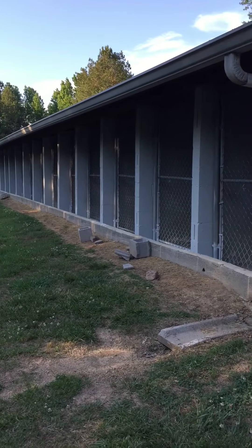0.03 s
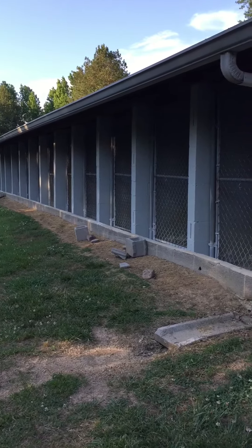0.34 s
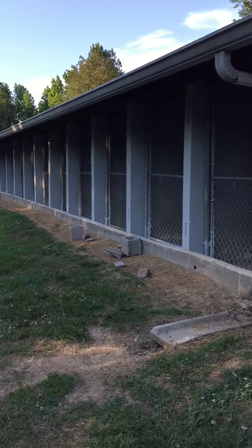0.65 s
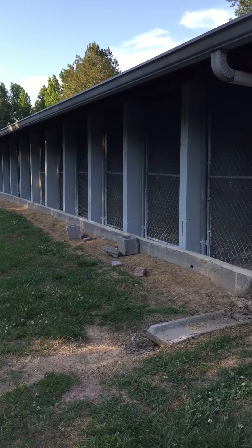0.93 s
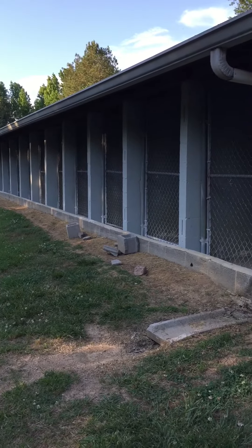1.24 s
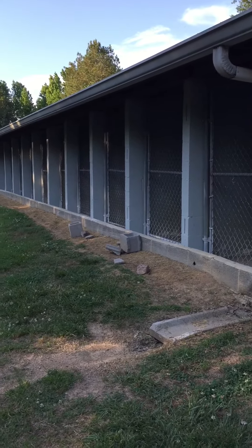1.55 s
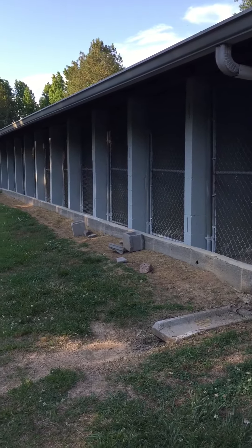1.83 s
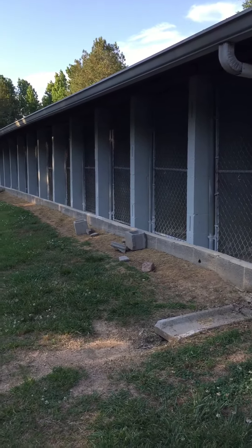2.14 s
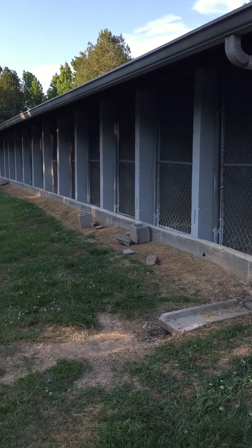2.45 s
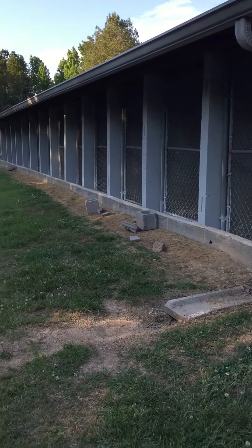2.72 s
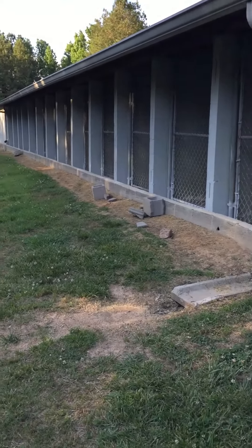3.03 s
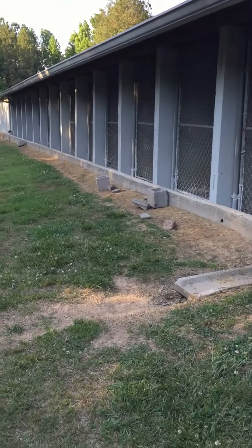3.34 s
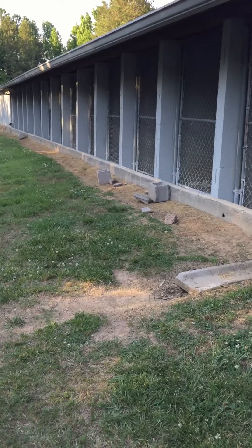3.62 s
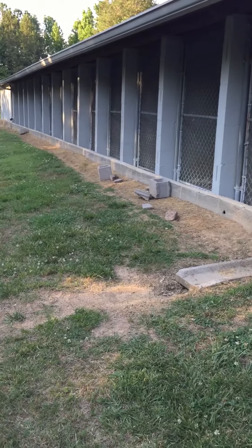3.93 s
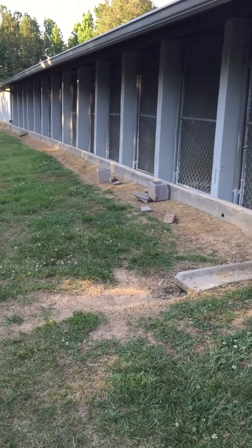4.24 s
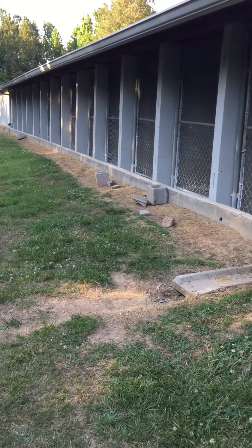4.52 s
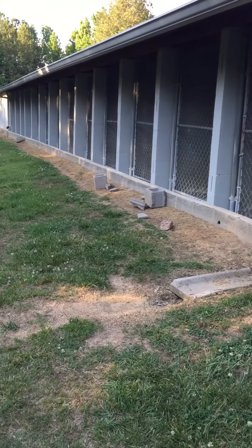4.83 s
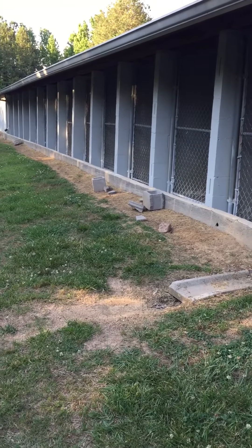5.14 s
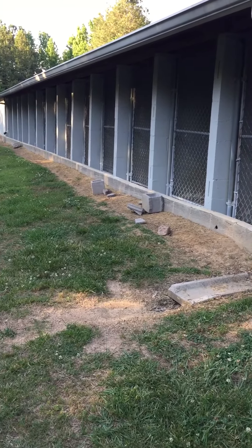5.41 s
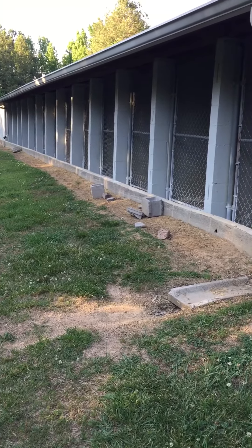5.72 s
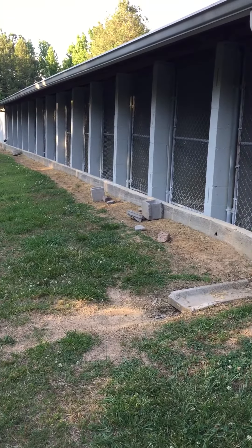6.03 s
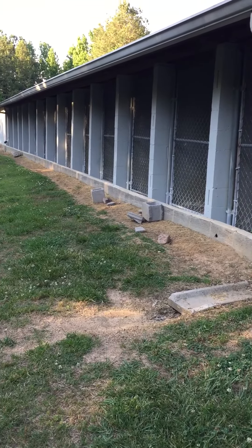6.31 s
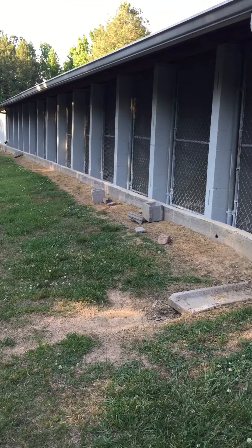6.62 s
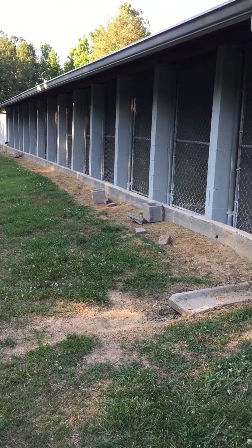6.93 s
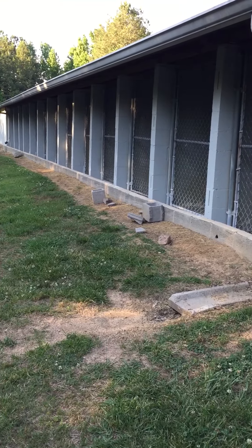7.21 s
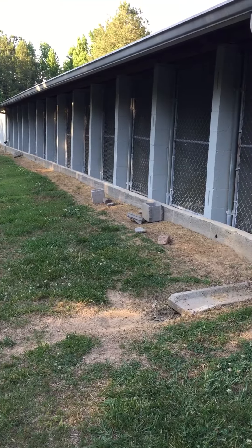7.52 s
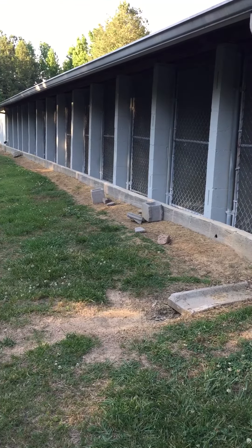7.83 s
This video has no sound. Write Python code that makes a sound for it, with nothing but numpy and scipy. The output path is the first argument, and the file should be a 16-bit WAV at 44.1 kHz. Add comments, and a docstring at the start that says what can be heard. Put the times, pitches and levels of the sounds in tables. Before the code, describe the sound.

Several dogs yelp, whine and howl over one another in an echoing kennel, heard from outside with light wind.

```python
"""Dogs yelp and howl in a long concrete kennel block, heard from the grass outside.
Their vocal folds make high, hoarse yelps and cleaner howls that slide from one note to another.
Thin whines and far woofs join in, and a big dog moans at the end.
The hard walls smear every glide into an echo, and light wind bumps the microphone over a soft hush."""
import sys
import numpy as np
from scipy import signal
from scipy.fft import rfft, irfft, next_fast_len
from scipy.io import wavfile

SR = 44100
rng = np.random.default_rng(int(sys.argv[2]) if len(sys.argv) > 2 else 0)


def wav_out(sig):
    """Save sig, one row per channel (or a flat mono array), as 16-bit PCM at SR to the path in sys.argv[1]."""
    wavfile.write(sys.argv[1], SR, np.round(np.clip(np.atleast_2d(sig).T, -1, 1) * 32767).astype(np.int16))


N = 347067
TIME = np.arange(N) / SR
CUTOFF_HZ = 15700


# How a wide-open mouth boosts or weakens overtones: frequency_hz, gain_db
YELP_MOUTH = [(1050, -13.5), (1450, 3), (1750, 1.5), (2200, -2.5), (2450, -4), (2700, -27), (3000, -20),
              (3320, -5), (3750, -16.5), (4350, -11), (4800, -18.5), (6500, -18.5), (9000, -33.5)]
# One yelp a row: start_s, length_s, pitch_hz, crack_octaves, fall_octaves, level_db,
# roughness (0 to 1), octave_db, overtones_db, rasp_db
YELPS = [ (2.008, 0.16, 1120, .17, 0.67, -34.5, 0.79, -2.5, -33.5, 0),
         (2.435, .15, 1076, 0.14, 0.18, -35, 0.56, -5.5, -32.5, -8.5),
         (2.796, .15, 1462, 0.019, 0.044, -31.5, 0.54, -8, -27, -6),
         (3.4, 0.2, 1146, 0.29, 0.28, -33, 0.8, -2, -31, 4),
         (4.459, .13, 701.5, 0.27, .35, -32, 0.8, -11.5, -32.5, -16),
         (5.114, .18, 958, 0.063, 0.61, -37, 0.75, -9, -32, -7.5),
         (6.117, 0.14, 1051, .06, 0.01, -35, 0.59, -5.5, -27.5, -17.5)]

def yelp(start_s, length_s, pitch_hz, crack_octaves, fall_octaves, level_db,
         roughness, octave_db, overtones_db, rasp_db):
    """The voice scoops up, turns hoarse, cracks upward, then drops as the breath runs out."""
    t = clock(length_s)
    hoarseness = roughness * (1 + np.tanh((t - .042) / .026)) / 2
    scoop = .22 * np.exp(-t / .029)
    crack = crack_octaves * np.exp(-((t - .07) / .012) ** 2)
    fall = fall_octaves * np.exp(-(np.maximum(length_s - t, 0) / .04) ** 2)
    pitch = pitch_hz * 2 ** (crack - scoop - fall)
    level_db += envelope_db(t, length_s, attack_s=.029, release_s=.069, edge_db=-20.5)
    voice = vocal_folds(pitch, level_db, hoarseness, octave_db, overtones_db, YELP_MOUTH, harmonics=6,
                        waver=.019, jitter=.045, smear_hz=113.5, rasp_db=rasp_db,
                        growl_db=-23.5, strain_db=15)
    return place(start_s, voice)


# How a howling mouth shapes overtones: frequency_hz, gain_db
HOWL_MOUTH = [(700, 3), (1050, 1), (1450, -8), (1750, -5), (2050, 2), (2400, -2.5), (2750, -28),
              (3400, -23.5), (3750, -20), (4300, -21), (4900, -25), (6000, -15), (7600, -22.5),
              (8500, -31.5)]
# One howl a row (slide_at_s and peak_at_s count from its start): start_s, length_s, first_hz, second_hz,
# slide_at_s, slide_s, level_db, peak_at_s, fade_db_per_s, roughness (0 to 1), octave_db, overtones_db
HOWLS = [ (2.471, .14, 587, 560, .08, .02, -48, 0.036, 40, 0.04, -20, -35.5),
         (2.55, .13, 844.3, 681, 0.09, 0.011, -28, 0.028, 176.5, 0.2, -15.5, -41.5),
         (3.655, 0.18, 906.4, 633.5, 0.098, .024, -34.5, 0.044, 16.5, 0.22, -13, -38.5),
         (3.846, 0.22, 640, 597, 0.086, 0.037, -37, .05, 12.5, .08, -22.5, -41),
         (4.017, 0.41, 780.1, 671.3, .118, .013, -25, 0.049, 28, 0.12, -4.5, -38),
         (4.242, 0.3, 682.3, 649.3, 0.093, 0.023, -26.5, 0.013, 36, 0.11, -4.5, -37.5),
         (4.621, 0.79, 697, 640, .52, 0.032, -25, 0.1, 53.5, 0.04, -14.5, -38.5),
         (4.648, 0.57, 749.6, 682.7, 0.24, 0.02, -38, 0.081, 9.5, .1, -16, -22.5),
         (5.287, 0.38, 768, 637, .235, 0.019, -33.5, 0.21, 22, .09, -11.5, -32),
         (5.729, 0.71, 645, 654.8, 0.16, 0.02, -27.5, 0.053, 143.5, 0.07, -39.5, -33),
         (6.228, 0.68, 830.3, 531.2, 0.21, 0.027, -34, 0.059, 46.5, 0, -7.5, -33)]

def howl(start_s, length_s, first_hz, second_hz, slide_at_s, slide_s, level_db, peak_at_s,
         fade_db_per_s, roughness, octave_db, overtones_db, mouth=HOWL_MOUTH, harmonics=12):
    """A held note slides to a second one, swelling and fading with the breath."""
    t = clock(length_s)
    progress = (1 + np.tanh((t - slide_at_s) / slide_s / 2)) / 2
    sag_octaves = .03174 * t
    pitch = (first_hz + (second_hz - first_hz) * progress) * 2 ** -sag_octaves
    # During the slide the voice frays and its octave gets louder.
    sliding = 2 * np.sqrt(progress * (1 - progress))
    roughness += 1.7 * np.log2(first_hz / second_hz) ** 2 * sliding
    octave_db += 5.5 * sliding
    # The highest overtones ring out in mid-howl, more so in a loud one.
    near_ends = np.cos(np.pi * np.minimum(t / length_s, 1)) ** 2
    ring_db = 10.5 + 4.6 * (level_db + 25.5) - 15 * near_ends
    level_db -= fade_db_per_s * np.abs(t - peak_at_s)
    level_db += envelope_db(t, length_s, attack_s=.014, release_s=.036, edge_db=-17)
    voice = vocal_folds(pitch, level_db, roughness, octave_db, overtones_db, mouth, harmonics,
                        waver=.005, jitter=.065, smear_hz=83, rasp_db=-24.5,
                        growl_db=-28.5, strain_db=23, ring_db=ring_db)
    return place(start_s, voice)


# The tone of the rasp in a hoarse cry: frequency_hz, level_db
RASP_COLOUR = [(480, -40.5), (700, -2.5), (1050, -8.5), (1470, 32), (1650, -17), (1900, -23.5), (2250, 2.5),
               (2700, -33.5), (3300, -18.5), (3800, -29), (4300, -20.5), (5000, -36), (7000, -23.5),
               (12000, -46)]

def vocal_folds(pitch_hz, level_db, roughness, octave_db, overtones_db, mouth, harmonics,
                waver, jitter, smear_hz, rasp_db, growl_db, strain_db, ring_db=0):
    """Vibrating folds make a note, its octave, and higher overtones that grow with strain."""
    size = len(pitch_hz)
    roughness = np.clip(roughness, 0, 1)
    pitch_hz = pitch_hz * (1 + waver * drift(28.8, size) + jitter * roughness * drift(110, size))
    phase = 2 * np.pi * np.cumsum(pitch_hz) / SR
    tones = [(1, 1), (2, from_db(octave_db + at_hz(mouth, 2 * pitch_hz)))]   # multiple of pitch, gain
    for k in range(3, harmonics + 1):
        # Each overtone swells and fades on its own as the head moves.
        swell_db = 3 * drift(6, size) + ring_db * (k * pitch_hz > 4500)
        tone_db = overtones_db + swell_db + strain_db * roughness * 3 / k
        tones.append((k, from_db(tone_db + at_hz(mouth, k * pitch_hz))))
    # In a half-rough voice, strong and weak vibrations take turns and add in-between tones.
    growl = from_db(growl_db) * np.exp(-((roughness - .45) / .1) ** 2)
    tones += [(1 / 2, growl), (3 / 2, growl)]
    voice = np.zeros(size)
    for k, gain in tones:
        # Irregular vibration blurs each tone toward noise.
        unsteady = np.sqrt(1 - roughness ** 2) + roughness * flutter(smear_hz, size)
        voice += gain * (k * pitch_hz < CUTOFF_HZ) * np.real(unsteady * np.exp(1j * k * phase))
    rasp = from_db(rasp_db) * roughness ** 2 * noise(RASP_COLOUR, size)
    return from_db(level_db) * (np.sqrt(2) * voice + rasp)


# How the mouth shapes a deep voice's overtones: frequency_hz, gain_db
DEEP_MOUTH = [(750, 1.5), (920, -20), (1050, -1.5), (1280, -10), (1450, -36.5), (2200, -24)]
# One moan a row, with the same columns as HOWLS
MOANS = [ (7.19, .13, 480, 404.8, 0.0352, 0.015, -40.5, 0.019, 62, 0.51, -10, -16),
         (7.27, 0.349, 406.6, 416.3, .09, 0.027, -39, 0.3, 32, 0.031, -21, -36),
         (7.584, .38, 503, 533.8, 0.12, 0.063, -51.5, 0.3, 31, 0.025, 3, -43),
         (7.68, .26, 419, 410.6, 0.072, .03, -53, 0.13, 4, 0.014, -20, -34)]

def moan(*row):
    """A big dog's moan is a low howl with few overtones."""
    return howl(*row, mouth=DEEP_MOUTH, harmonics=4)


# Big dogs' woofs and, at 4.54 s and 5.25 s, the low undertones of hoarse yelps:
# peak_s, pitch_hz, level_db
GRUFF_NOTES = [(1.429, 530, -63.5), (2.607, 412, -55.5), (3.112, 392.3, -49.5), (3.13, 591, -54.5),
               (3.201, 445, -60.5), (3.741, 367.3, -52.5), (3.819, 426, -53.5), (4.281, 513, -51.5),
               (4.54, 589, -42.5), (4.928, 496, -57), (5.25, 562, -42.5), (5.859, 431, -49.5),
               (7.22, 432.7, -44)]

def gruff_note(peak_s, pitch_hz, level_db, attack_s=.027, release_s=.09, edge_db=-18):
    """A short woof or a yelp's undertone; its pitch rises and falls with its loudness."""
    length_s = attack_s + release_s
    shape_db = envelope_db(clock(length_s), length_s, attack_s, release_s, edge_db)
    pitch = pitch_hz * (1 - .1 * shape_db / edge_db)
    voice = vocal_folds(pitch, level_db + shape_db, roughness=.72, octave_db=-16.5, overtones_db=-17.5,
                        mouth=DEEP_MOUTH, harmonics=3, waver=.056, jitter=.056, smear_hz=70.6,
                        rasp_db=-26, growl_db=-23.5, strain_db=7)
    return place(peak_s - attack_s, voice)


# Whines through the nose and, at 4.66 s, a high overtone ringing out of the long howl:
# start_s, length_s, pitch_hz, bend (1 is the usual glide), level_db, overtones_db
THIN_TONES = [ (1.09, 0.25, 3548, 1.8, -68, -9.5), (1.628, 0.18, 3340, .8, -68.5, -17),
              (2.029, 0.29, 3310, 1.4, -64.5, -19), (2.429, 0.17, 3180, 0.76, -59.5, -36),
              (2.799, 0.3, 3160, 1.28, -62, -2), (3.368, 0.32, 3096, 0.9, -57.5, -4.5),
              (4.108, 0.15, 3075, 0.69, -66, -27.5), (4.66, 0.18, 3507, .5, -69.5, -23.5),
              (5.124, 0.56, 2990, 1, -69, -1), (5.822, 0.31, 2990, 0.15, -78.5, 3),
              (6.355, .54, 3132, 0.94, -59, -8.5), (6.976, 0.31, 8200, 0.12, -71, -36.5)]

def thin_tone(start_s, length_s, pitch_hz, bend, level_db, overtones_db):
    """A high, trembling tone: a whistled whine or a howl's ringing overtone."""
    pitch, shape_db = rise_and_sink(length_s, pitch_hz, bend)
    wavering = pitch * (1 + .0065 * drift(45, len(pitch)))
    phase = 2 * np.pi * np.cumsum(wavering) / SR
    tone = np.sin(phase)
    for k, drop_db in [(2, 0), (3, 24), (4, 24)]:
        tone += from_db(overtones_db - drop_db) * (k * pitch < CUTOFF_HZ) * np.sin(k * phase)
    tremble_db = 2.5 * drift(22, len(pitch))
    return place(start_s, np.sqrt(2) * from_db(level_db + shape_db + tremble_db) * tone)


def rise_and_sink(length_s, pitch_hz, bend):
    """A pitch and a level that both rise quickly, then sink."""
    t = clock(length_s)
    glide = -.017 * np.exp(-t / .044) - .17 * t
    shape_db = envelope_db(t, length_s, attack_s=.033, release_s=.093, edge_db=-19.5) - 17.5 * t
    return pitch_hz * 2 ** (bend * glide), shape_db


# One faint whimper: start_s, length_s, pitch_hz, level_db, octave_db
WHIMPERS = [(1.085, .17, 460, -82, 14)]

def whimper(start_s, length_s, pitch_hz, level_db, octave_db):
    """A thin whine made with the voice, nearly all overtones."""
    pitch, shape_db = rise_and_sink(length_s, pitch_hz, bend=.96)
    voice = vocal_folds(pitch, level_db + shape_db, roughness=.22, octave_db=octave_db,
                        overtones_db=10.5, mouth=HOWL_MOUTH, harmonics=6, waver=.012, jitter=.037,
                        smear_hz=39.7, rasp_db=-6, growl_db=-20, strain_db=10)
    return place(start_s, voice)


# The tone of air in a nose: frequency_hz, level_db
NOSE_COLOUR = [(1200, -7.5), (1900, -6.5), (2700, 0.5), (3400, 1), (4000, -27), (7000, -30), (10000, -43)]
# One puff a row: middle_s, half_length_s, level_db
NOSE_PUFFS = [(.58, 0.12, -79.5), (1.195, 0.067, -71), (1.716, .09, -73)]

def nose_puffs():
    """Air hisses softly through a dog's nose before and during the first whines."""
    swells = sum(from_db(level_db) * bell_curve(TIME - middle_s, half_length_s)
                 for middle_s, half_length_s, level_db in NOSE_PUFFS)
    return swells * noise(NOSE_COLOUR, N)


# How long the echo takes to fade by 60 dB: frequency_hz, fade_s
ECHO_TIMES = [(350, 0.53), (1000, 1.1), (2500, 0.89), (6000, 0.84), (12000, 0.1)]

def kennel(sound, direct_db, echo_db, build_s):
    """The direct sound plus a dense echo off concrete walls and roof; the treble dies first."""
    t = TIME[:SR * 3 // 2]
    edges_hz = np.geomspace(150, 16000, 9)
    build_up = 1 - np.exp(-(t / build_s) ** 2)
    tail = np.zeros(len(t))
    for low, high in zip(edges_hz, edges_hz[1:]):
        band = filtered(rng.standard_normal(len(t)), 2, [low, high], "band")
        decay = from_db(-60 * t / at_hz(ECHO_TIMES, np.sqrt(low * high))) * build_up
        tail += band * decay / np.sqrt(np.sum(decay ** 2))
    return from_db(direct_db) * sound + from_db(echo_db) * signal.fftconvolve(sound, tail)[:N]


# One bump of wind a row: middle_s, level_db, half_length_s, top_hz
WIND_BUMPS = [(0.744, -43, 0.011, 65.5), (1.027, -53.5, 0.048, 76), (1.341, -39, 0.017, 139),
              (1.514, -48.5, 0.014, 87), (1.789, -36.5, 0.0056, 87), (1.956, -53, 0.08, 87),
              (3.138, -48, 0.048, 99.2), (3.21, -37, 0.028, 87.4), (3.39, -51, 0.073, 75.6),
              (5.998, -52, 0.026, 85), (6.295, -57, 0.076, 80), (6.843, -57, 0.063, 68.4),
              (7.567, -52.5, 0.074, 82.4)]

def wind_bumps(low_hz=38):
    """Each swirl of air shakes the microphone with a brief, low rumble."""
    t = np.arange(-SR // 2, SR // 2) / SR
    out = np.zeros(N)
    for middle_s, level_db, half_length_s, top_hz in WIND_BUMPS:
        swell = bell_curve(t, half_length_s)
        bump = filtered(rng.standard_normal(len(t)), 3, [low_hz, top_hz], "band") * swell
        bump *= np.sqrt(np.sum(swell ** 2) / np.sum(bump ** 2))
        out += from_db(level_db) * np.interp(TIME - middle_s, t, bump, left=0, right=0)
    return out


# The tone of the breeze: frequency_hz, level_db
BREEZE_COLOUR = [(20, -26), (45, 2.5), (75, 0.5), (150, -18.5), (400, -41.5)]

def breeze(level_db=-73, swing_db=4):
    """Small swirls of air make a faint, lumpy rumble."""
    return from_db(level_db - swing_db * drift(20, N)) * noise(BREEZE_COLOUR, N)


# The tone of the background: frequency_hz, level_db
HUSH_COLOUR = [(20, -18), (35, -3), (55, -0.5), (110, -6.5), (220, -11.5), (500, -20.5), (1200, -22),
               (2500, -23), (5000, -29), (9300, -32), (10400, -36.5), (11500, -34), (15500, -37)]

def hush(level_db=-66.5):
    """Steady outdoor hush and microphone hiss."""
    return from_db(level_db) * noise(HUSH_COLOUR, N)


def clock(length_s):
    """Seconds since a call began, running on to the next quarter second."""
    return TIME[:int(np.ceil(length_s * 4)) * SR // 4]


def envelope_db(t, length_s, attack_s, release_s, edge_db):
    """Rise from `edge_db`, hold at 0 dB, then fall away."""
    return edge_db * (np.maximum(1 - t / attack_s, 0) + np.maximum(1 - (length_s - t) / release_s, 0))


def bell_curve(t, half_length_s):
    """A smooth hump that peaks at t = 0."""
    return np.exp(-.5 * (t / half_length_s) ** 2)


def place(start_s, call):
    """Set a call into the scene with click-free ends."""
    fades = signal.windows.tukey(len(call), SR / 100 / len(call))
    return np.concatenate([np.zeros(int(start_s * SR)), fades * call, np.zeros(N)])[:N]


def noise(colour, size):
    """Noise of strength 1, with its lows and highs shaped by a table."""
    padded = next_fast_len(size)
    spectrum = rfft(rng.standard_normal(padded))
    gains = from_db(at_hz(colour, np.arange(len(spectrum)) * SR / padded))
    return rms_one(irfft(spectrum * gains, padded)[:size])


def drift(rate_hz, size):
    """A random wander of strength 1, up to about `rate_hz` fast."""
    return rms_one(filtered(rng.standard_normal(size + SR // 2), 2, rate_hz))[-size:]


def flutter(rate_hz, size):
    """Random swings of strength and phase that spread a tone by `rate_hz` each way."""
    white = rng.standard_normal((2, size + SR // 4))
    real, imag = filtered(white, 6, rate_hz)[:, -size:]
    return (rms_one(real) + 1j * rms_one(imag)) / np.sqrt(2)


def filtered(sound, order, hz, keep="low"):
    """Keep the lows, the highs or a band; a higher order cuts more steeply."""
    return signal.sosfilt(signal.butter(order, hz, keep, fs=SR, output="sos"), sound)


def at_hz(points, hz):
    """Read between a table's rows on a log-frequency axis."""
    table = np.array(points)
    return np.interp(np.log(np.maximum(hz, 1)), np.log(table[:, 0]), table[:, 1])


def from_db(db):
    """Decibels to gain."""
    return 10 ** (np.asarray(db) / 20)


def rms_one(x):
    """Scale to an average strength (rms) of 1."""
    return x / np.sqrt(np.mean(x ** 2) + 1e-20)


def scene():
    """All the dogs in the echoing kennel, with wind and hush outside."""
    yelps = sum(yelp(*row) for row in YELPS)
    whimpers = sum(whimper(*row) for row in WHIMPERS)
    howls = sum(howl(*row) for row in HOWLS)
    moans = sum(moan(*row) for row in MOANS)
    thin_sounds = sum(thin_tone(*row) for row in THIN_TONES) + nose_puffs()
    gruff_notes = sum(gruff_note(*row) for row in GRUFF_NOTES)
    dogs = kennel(yelps + whimpers, direct_db=-4.5, echo_db=.5, build_s=.014)
    dogs += kennel(howls + moans, direct_db=-3, echo_db=-2.5, build_s=.012)
    dogs += kennel(thin_sounds + gruff_notes, direct_db=0, echo_db=0, build_s=.002)
    return (dogs + wind_bumps() + breeze() + hush())[None]


def record(dry):
    """The small microphone loses the deepest bass; the highest treble is cut steeply."""
    thin = filtered(dry, 3, hz=38, keep="high")
    return signal.sosfilt(signal.ellip(10, .1, 80, CUTOFF_HZ, fs=SR, output="sos"), thin)


dry = scene()
out = record(dry)
wav_out(out)
```